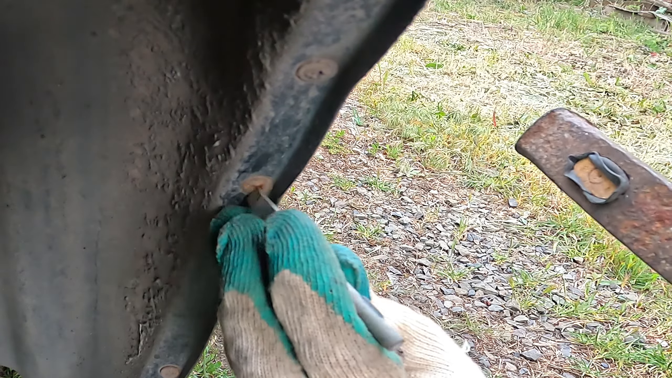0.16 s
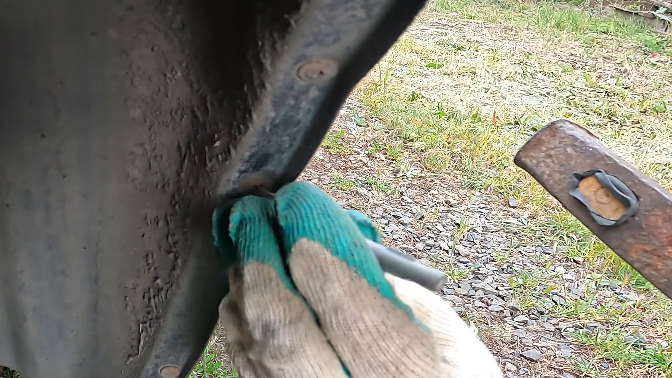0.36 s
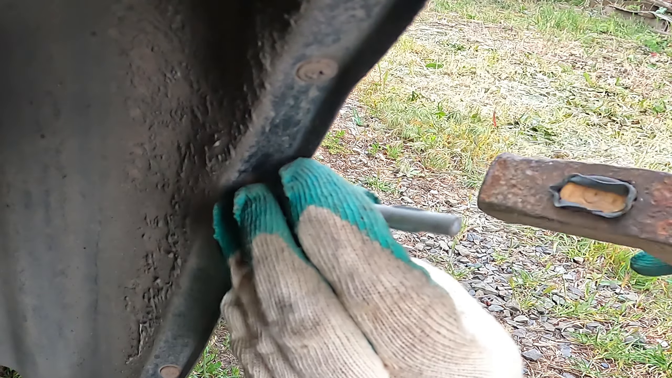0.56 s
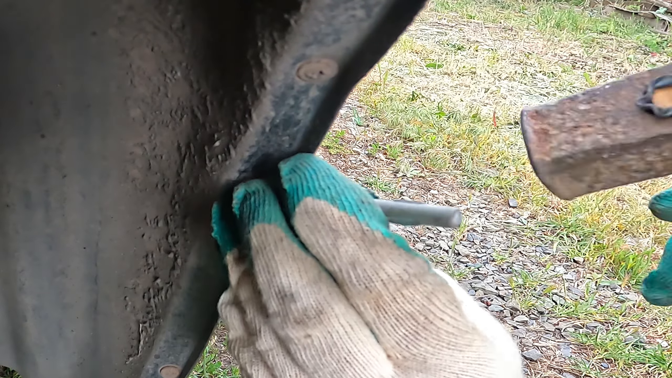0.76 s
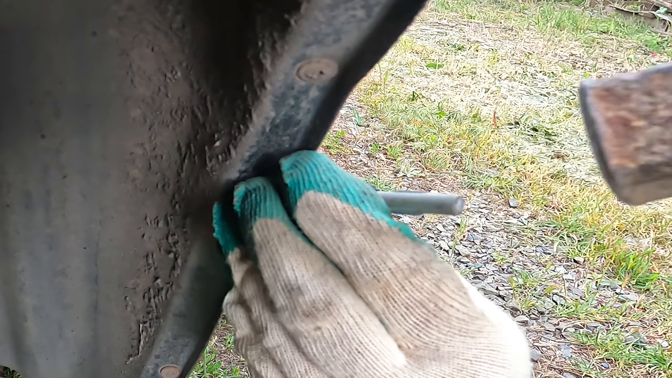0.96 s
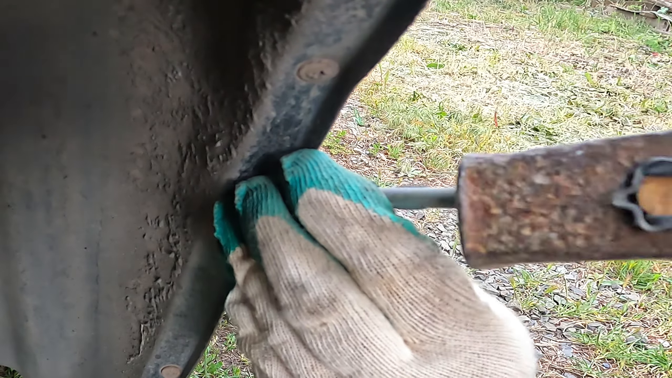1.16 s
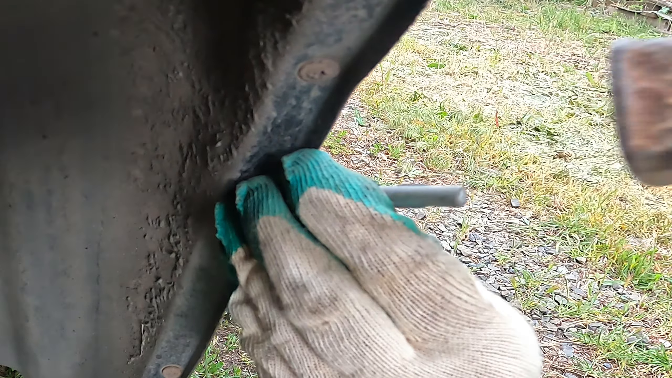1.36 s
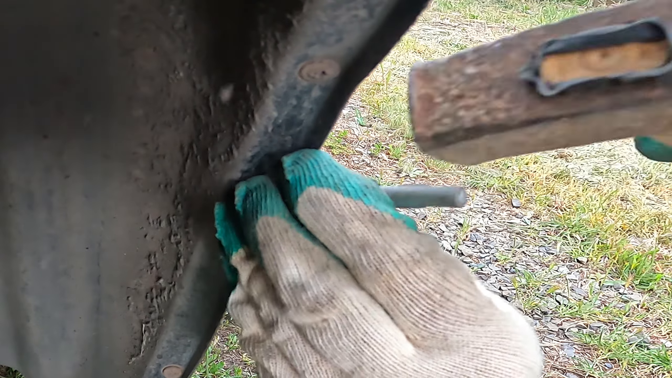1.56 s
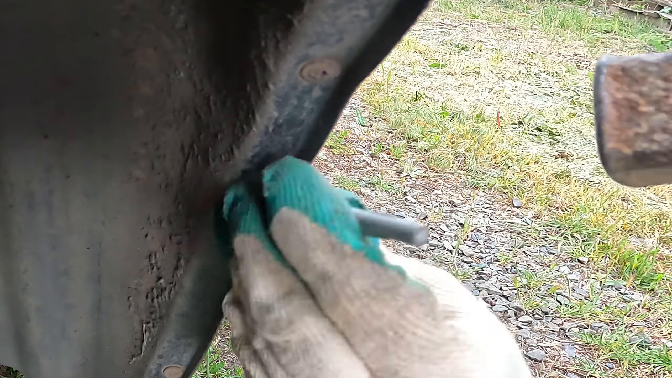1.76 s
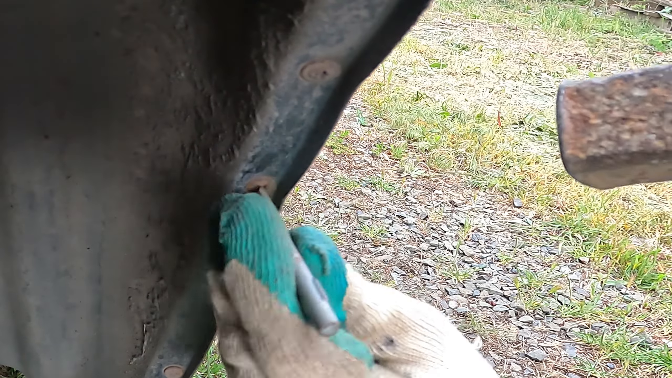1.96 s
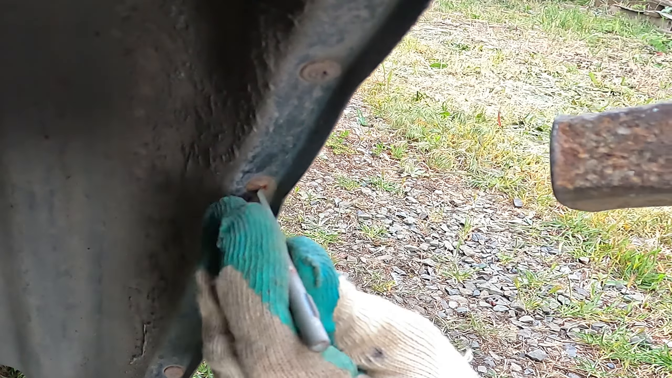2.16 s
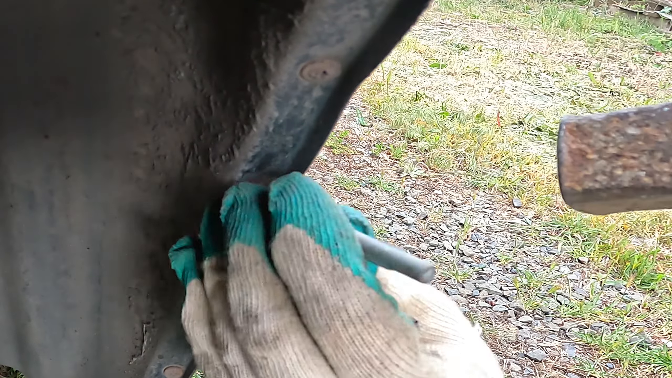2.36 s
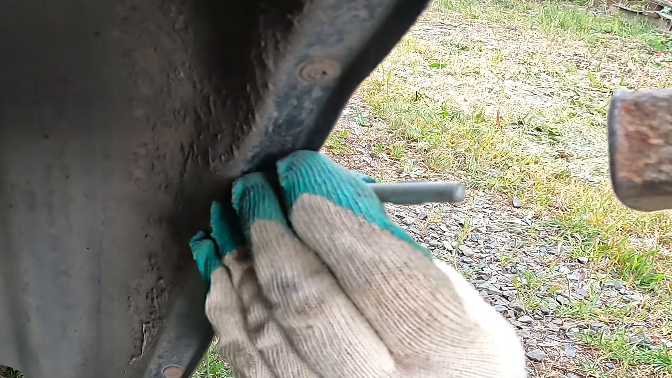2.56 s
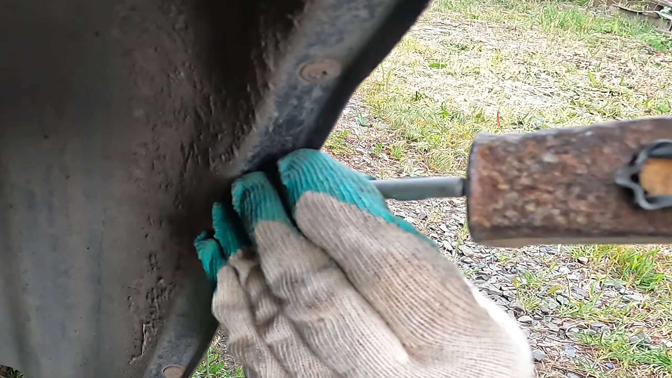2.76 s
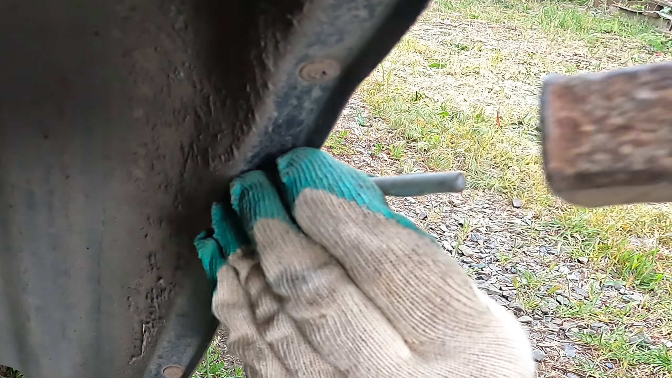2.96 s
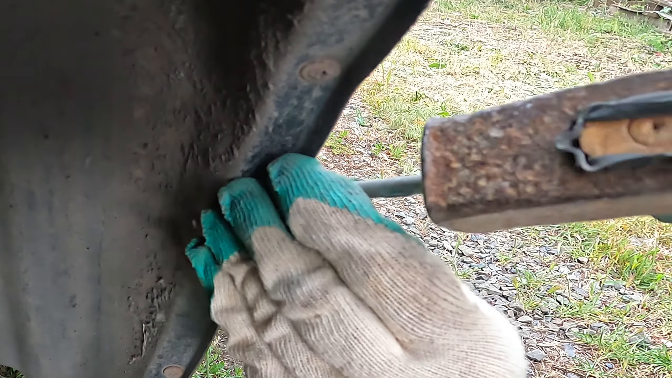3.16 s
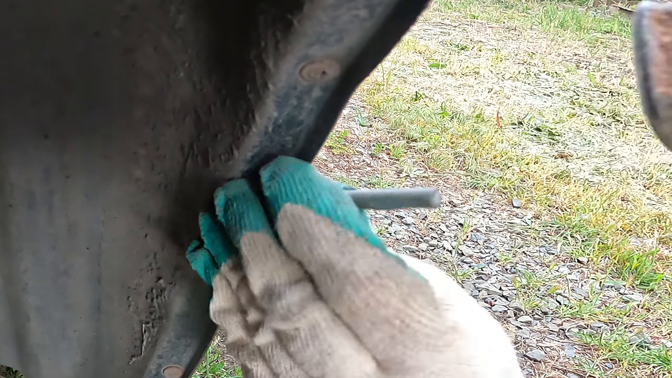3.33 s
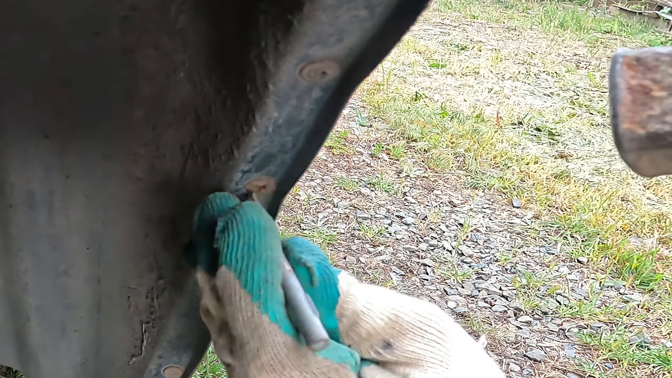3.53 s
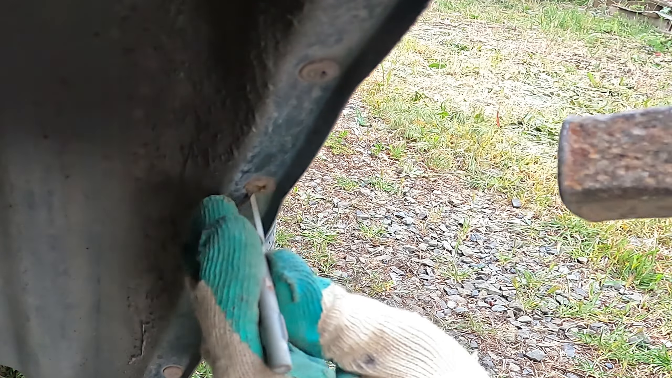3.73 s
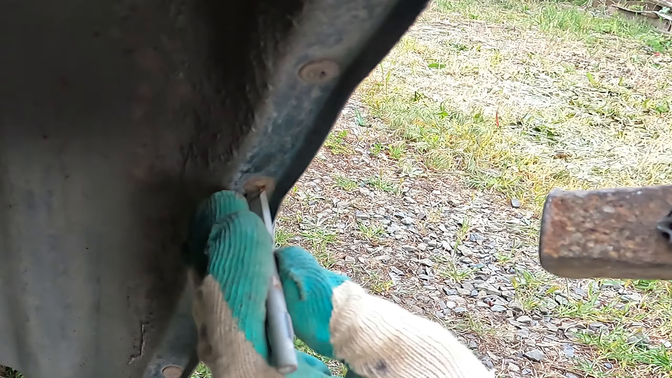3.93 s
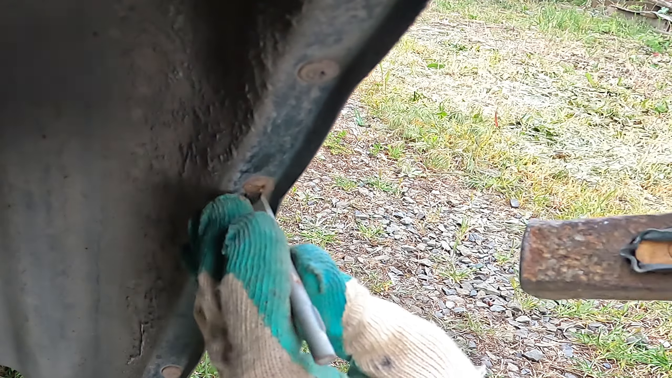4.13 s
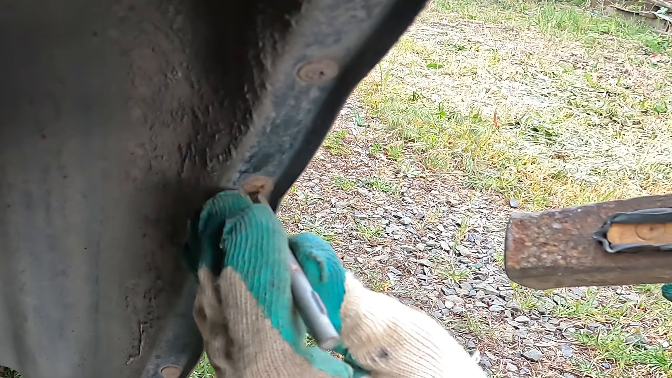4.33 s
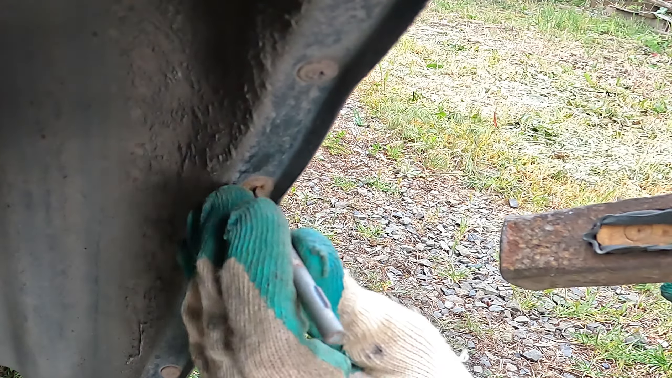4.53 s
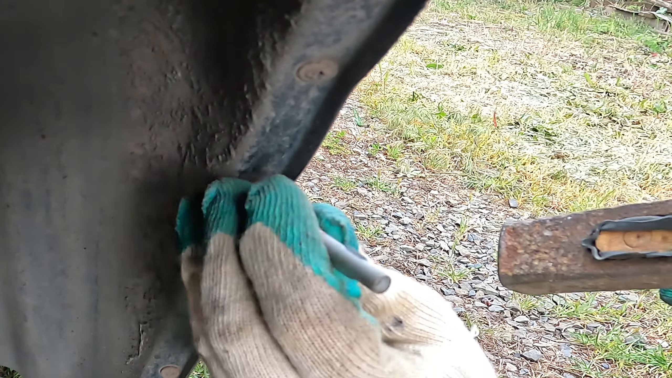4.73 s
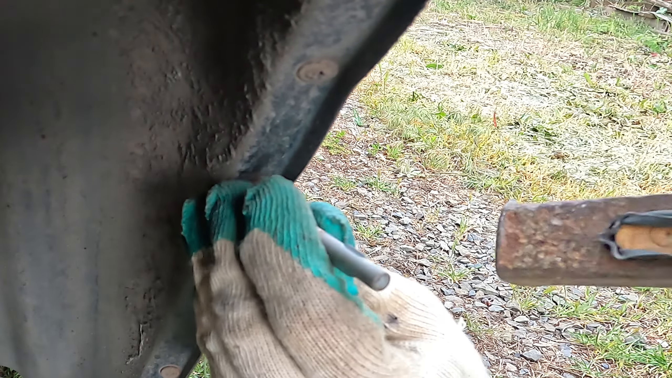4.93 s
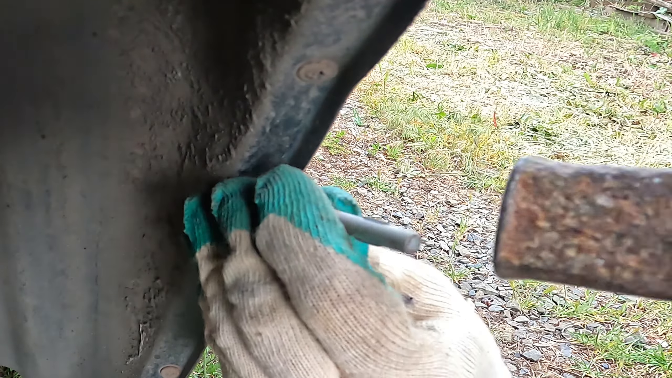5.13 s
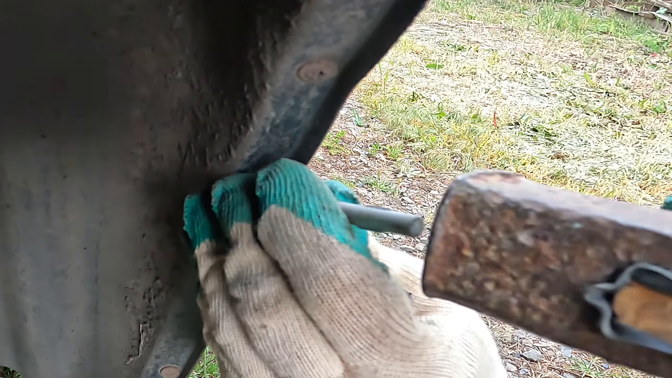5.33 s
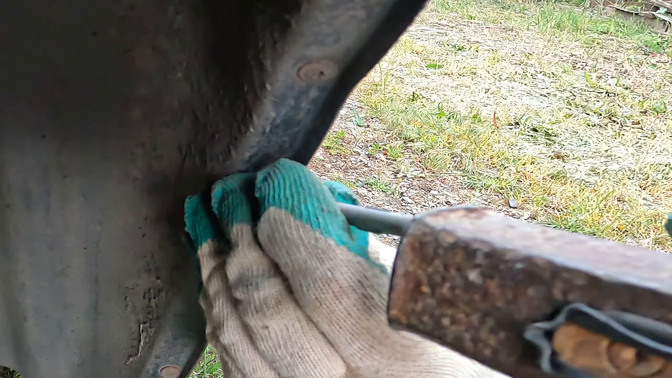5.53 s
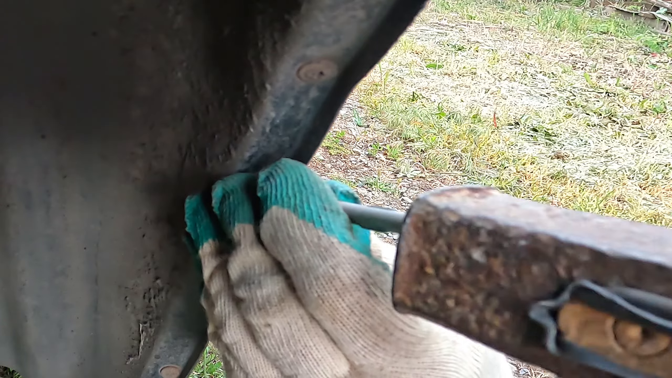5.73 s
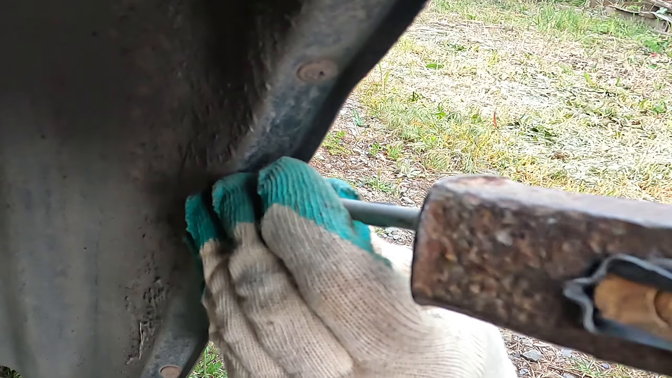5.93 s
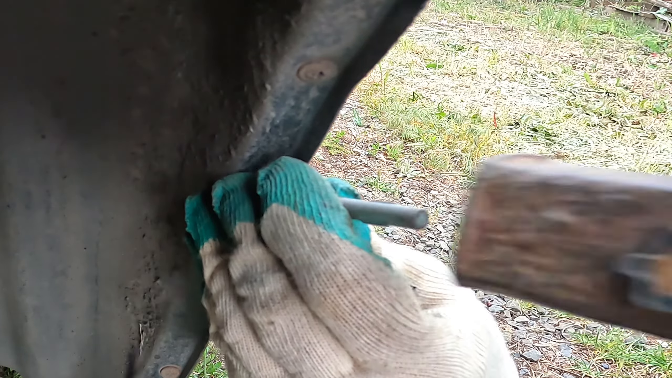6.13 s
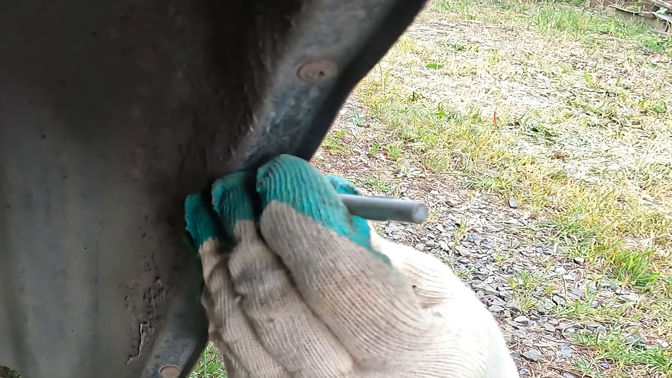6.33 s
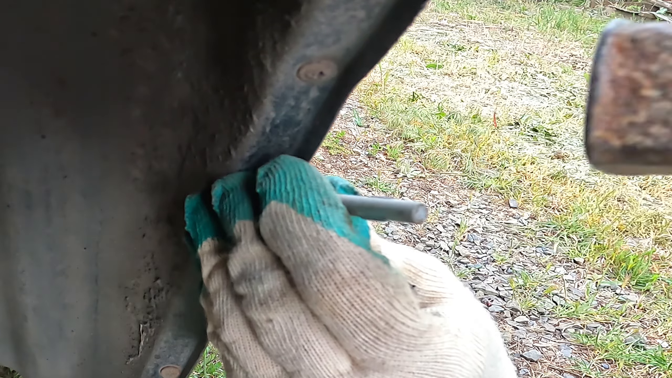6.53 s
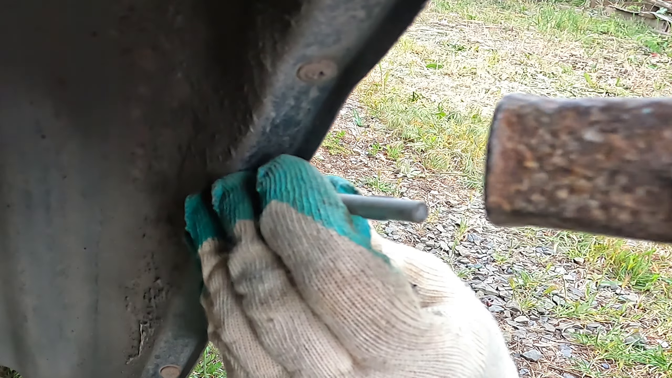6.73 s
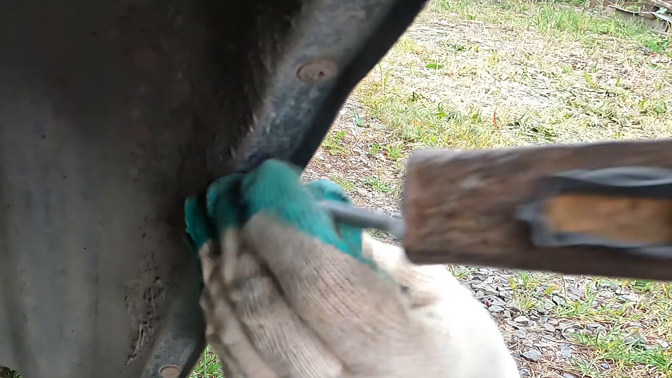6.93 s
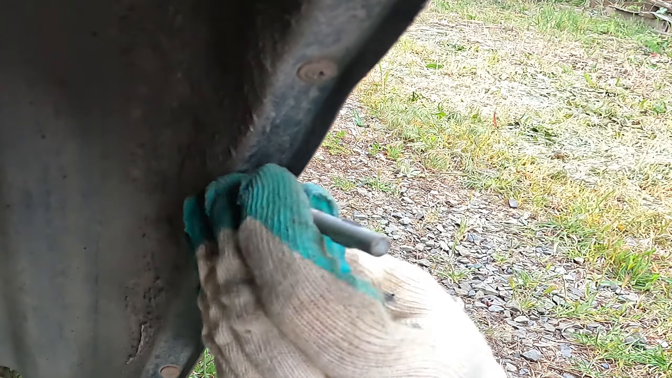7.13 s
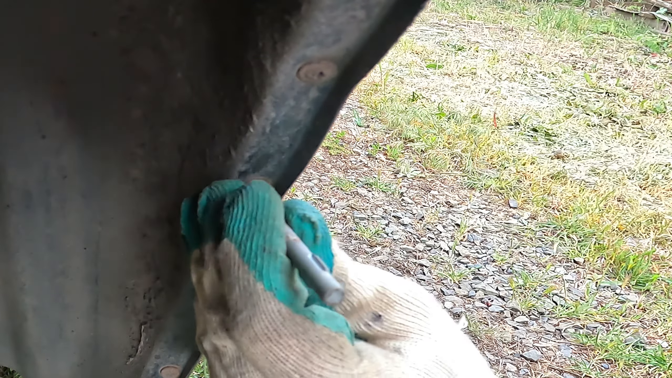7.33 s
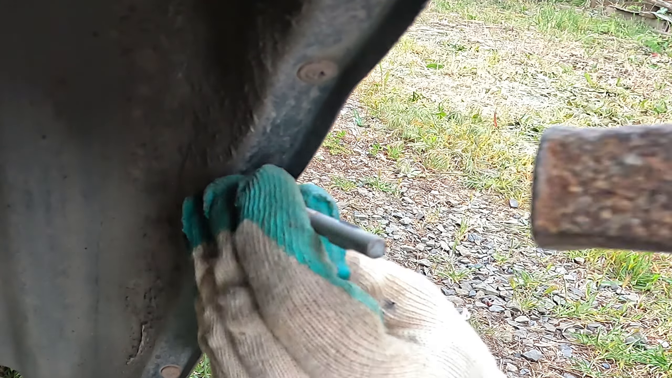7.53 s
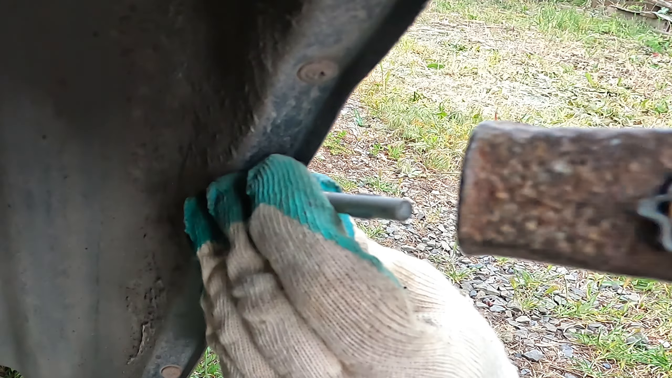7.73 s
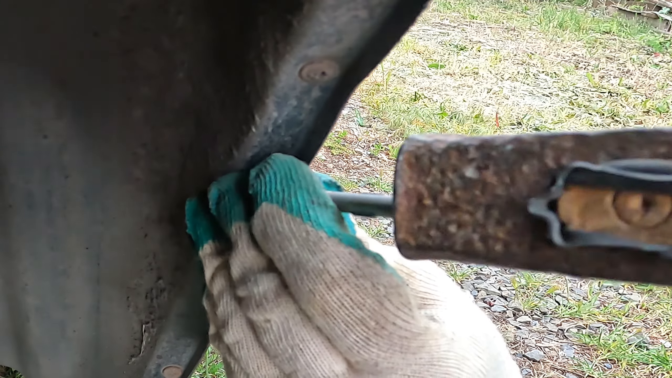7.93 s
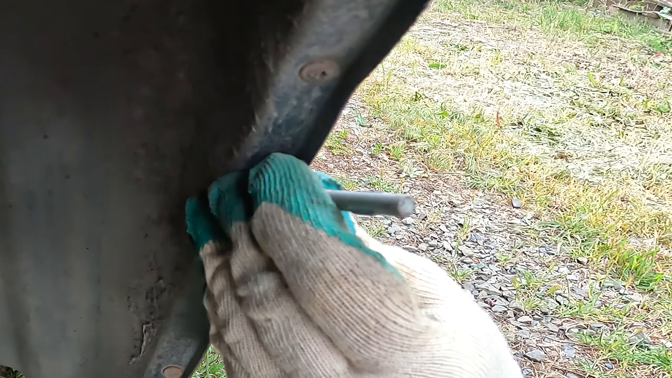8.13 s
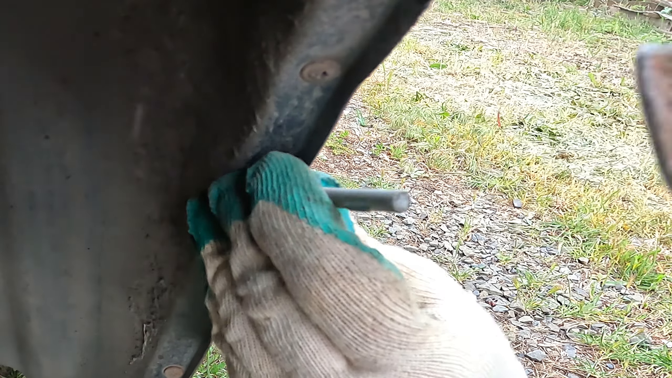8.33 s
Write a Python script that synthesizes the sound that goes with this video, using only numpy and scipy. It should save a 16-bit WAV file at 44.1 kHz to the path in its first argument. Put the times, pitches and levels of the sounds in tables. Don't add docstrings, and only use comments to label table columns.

```python
import sys
import numpy as np
from scipy import signal
from scipy.fft import rfft, irfft
from scipy.io import wavfile
from scipy.ndimage import uniform_filter1d, minimum_filter1d

SR = 44100
rng = np.random.default_rng(int(sys.argv[2]) if len(sys.argv) > 2 else 0)


def boost_factor(decibels):
    exponent = np.asarray(decibels, float) / 20
    return 10 ** exponent


def unload_wav(signal):
    wavfile.write(
        sys.argv[1],
        SR,
        np.round(np.clip(np.atleast_2d(signal).T, -1, 1) * 32767).astype(np.int16),
    )


N = 373968
HALF = np.array([[.5], [-.5]])
AHEAD_S = .0105


def read(points, hz):
    f, value = np.transpose(points)
    return np.interp(np.log(hz + 1), np.log(f + 1), value)


def curve(rows, t):
    s, *columns = np.transpose(rows)
    return [np.interp(t, s, c) for c in columns]


def evened(x):
    return x / np.sqrt(np.mean(x ** 2) + 1e-20)


def add(mix, s, sound, pan_db):
    part = mix[:, round(s * SR):][:, :len(sound)]
    part += sound[:part.shape[1]] * boost_factor(HALF * pan_db)


def ring(modes, t, rise_s, phase_spread, longest_s):
    hz, db, t60 = np.transpose(modes)[:, :, None]
    level_luck, phase_luck, pitch_luck = rng.standard_normal((3, len(modes), 1))
    pair = 1 + .3 * np.cos(2 * np.pi * .03 * hz * pitch_luck * t)
    fall_db = db + 1.5 * level_luck - 60 * t / np.minimum(t60, longest_s)
    phase = 2 * np.pi * hz * (1 + .008 * pitch_luck) * t + phase_spread * phase_luck
    out = (boost_factor(fall_db) * pair * np.sin(phase)).sum(0)
    out = out * (1 - np.exp(-t / rise_s)) ** 2
    return out / abs(out).max()


def burst(bands, t, width):
    z, hz = rfft(rng.standard_normal(len(t))), np.fft.rfftfreq(len(t), 1 / SR)
    out = 0
    for centre_hz, db, t60, tail_db, tail_t60 in bands:
        shape = np.exp(-(np.log(hz / centre_hz + 1e-9) / width) ** 2)
        decay = boost_factor(-60 * t / t60) + boost_factor(tail_db - 60 * t / tail_t60)
        out = out + evened(irfft(z * shape, len(t))) * boost_factor(db) * decay
    out = out * np.minimum(t / 0.00078, 1) ** 2
    return out / abs(out).max()


def swell(start, length, peak, edge):
    u = np.clip((np.arange(N) / SR - start) / length, 0, 1)
    warp = np.log(.5) / np.log(np.clip(peak, .1, .9))
    return np.sin(np.pi * u ** warp).clip(0) ** edge


# [f/Hz, left-right likeness]
COHERENCE = [(60, 1.0), (240, 1), (950, 0.47), (3770, 0.71), (15000, 0.99)]


def hiss(spectrum, size, patchy_db, flicker_db):
    hop, hz = size // 4, np.fft.rfftfreq(size, 1 / SR)
    a, b, c, d, patches = rng.standard_normal((N // hop + 5, len(hz), 5)).T
    patches = evened(uniform_filter1d(uniform_filter1d(patches, size=5, axis=0), size=7, axis=1))
    flicker = evened(uniform_filter1d(rng.standard_normal(a.shape[1]), size=3))
    same = np.clip(read(COHERENCE, hz), -1, .98)[:, None]
    left = a + 1j * b
    right = same * left + np.sqrt(1 - same ** 2) * (c + 1j * d)
    level_db = patchy_db * patches + flicker_db * flicker
    z = np.array([left, right]) * boost_factor(read(spectrum, hz)[:, None] + level_db)
    return evened(signal.istft(z, nperseg=size, noverlap=size - hop)[1][:, :N])


# [f/Hz, level/dB, t60/s, tail level/dB, tail t60/s]
CRACK = [(1760, -9.5, 0.0072, -22, 0.07), (2692, -10, 0.007, -20.5, 0.07), (3250, -8, 0.013, -21.5, 0.089),
         (4710, 1, 0.007, -24.5, 0.041), (6300, -3.5, 0.0065, -23, 0.045)]


def steel_crack(t, crack_db):
    looser_db = 0.25 * (crack_db + 6.0)
    bands = [(f, db, t60, tail_db - looser_db, tail_t60) for f, db, t60, tail_db, tail_t60 in CRACK]
    return boost_factor(crack_db) * burst(bands, t, 0.17)


# [f/Hz, level/dB, t60/s, tail level/dB, tail t60/s]
SIZZLE = [(7415, -5.5, 0.023, -28.5, 0.05), (9660, 3.5, 0.0057, -21, 0.027),
          (12400, -11.5, 0.014, -25, .025), (14600, -28.5, .01, -29.5, .02)]


def steel_sizzle(t, sizzle_db):
    return boost_factor(sizzle_db) * burst(SIZZLE, t, 0.13)


# [f/Hz, level/dB, t60/s]
CLANK = [(980, -3, 0.024), (1030, -8, 0.21), (1035, -1, 0.032), (1148.6, -15.5, 0.12), (1153, -7, 0.043),
         (1196, -8, 0.06), (1316, -7, 0.18), (1588, -8, 0.13), (1892, -15.5, 0.047)]
KNOCK = [(419, -6.5, 0.072), (490, -2, 0.086), (555, -8.5, 0.091), (624, -5, 0.11), (689, -6, 0.14),
         (753, -2.5, 0.18), (910, -6.5, 0.052)]
BRACE = [(962, 0.5, 0.1), (750, -5, .07), (1160, -5.5, .06), (870, -3.5, .06)]


def bracket(t, clank_db, knock_db):
    hand_t60 = .055
    out = boost_factor(clank_db) * ring(CLANK, t, 0.00034, 1.3, hand_t60)
    out += boost_factor(knock_db - 13) * ring(BRACE, t, 0.00081, 1.9, .25)
    out += boost_factor(knock_db) * ring(KNOCK, t, 0.0065, 1.5, hand_t60)
    return out


# [f/Hz, level/dB, t60/s, tail level/dB, tail t60/s]
RATTLE = [(598.6, 0, .06, -27, 0.29), (1000, 0.5, .06, -25, 0.27), (1590, -8.5, .055, -28, .2),
          (2500, -17, .05, -26, .2), (4000, -25, .04, -22, .2)]


def rattle(t, clank_db, knock_db):
    level_db = knock_db + .15 * (clank_db - knock_db) - 4.0
    return boost_factor(level_db) * burst(RATTLE, t, 0.52)


# [f/Hz, level/dB, t60/s]
BOOM = [(141.7, -15.5, .08), (171.3, -8, 0.21), (195.1, -4.5, 0.073), (213, 4.5, 0.08),
        (241.9, -7.5, 0.068), (272, -6, 0.035), (322.8, -11, 0.1), (397.3, -14.5, 0.062)]
# [f/Hz, level/dB, t60/s, tail level/dB, tail t60/s]
THUD = [(180, -2.5, 0.18, -24, .9), (260, -11, .1, -26, .6), (350, -14, 0.12, -28, 0.34)]


def panel_boom(t):
    thud = burst(THUD, t, 0.25) * (1 - np.exp(-t / 0.005)) ** 2
    return ring(BOOM, t, 0.0081, 0.093, .09) + boost_factor(-4) * thud


# [f/Hz, left lead/rad, left-right level/dB]
PANEL_SIDES = [(100, 0, 1), (240, -.3, 1.5), (300, .6, 5), (390, .7, -6), (480, -1.3, 5), (610, -.3, 3),
               (800, -1.4, -5), (960, .3, 4), (1300, -1.1, 2), (2200, -.9, 7), (3800, -1, -2),
               (5400, -.5, -2), (8000, .5, 0), (13000, .9, 3)]


def radiate(x):
    hz, (f, lead, balance) = np.fft.rfftfreq(N, 1 / SR), np.transpose(PANEL_SIDES)
    sides = np.exp(1j * HALF * read(np.c_[f, lead], hz)) * boost_factor(HALF * read(np.c_[f, balance], hz))
    wall = boost_factor(-34.5) * np.exp(-2j * np.pi * hz * .14) / (1 + (hz / 700) ** 2)
    thin_tone = boost_factor(-12) / (1 - 1j * (hz - 8000) / 36) ** 2
    return irfft(rfft(x, axis=1) * sides * (1 + wall + thin_tone), N, axis=1)


# [t/s, force level/dB, boom level/dB, knock level/dB, sizzle level/dB]
BLOWS = [(1.251, -5.5, -6.5, -10, -21), (1.2998, -23, -9, -17, -47), (1.3265, -31, -14, -22, -55.5),
         (1.5987, -3.5, -8.5, -11, -16), (2.8977, -11, -12, -9, -28), (3.2392, -1, -7.5, -9.5, -9),
         (5.554, -8, -5.5, -14.5, -21.5), (5.796, -7.5, -6.5, -14.5, -21.5), (6.024, -9, -5.5, -12, -20),
         (6.2798, -9.5, -7, -12.5, -20), (7.0619, -6, -9, -9.5, -12.5), (7.9344, -11.5, -7, -17, -22),
         (7.9774, -24, -11.5, -17, -55), (7.9978, -33, -15, -21, -66), (8.314, -4, -6, -9.5, -8.5)]


def blows():
    out, t = np.zeros((2, N)), np.arange(16384) / SR
    for s, crack_db, boom_db, knock_db, sizzle_db in BLOWS:
        clank_db = crack_db - 1.5
        crack = steel_crack(t, crack_db)
        clank = bracket(t, clank_db, knock_db)
        for side in (-1, 1):
            add(out, s + .0006, rattle(t, clank_db, knock_db), side * 10.5)
        add(out, s + 0.00061, clank + crack + steel_sizzle(t, sizzle_db), 0)
        boom = panel_boom(t)
        add(out, s + .0052, boost_factor(boom_db + 3.0) * boom, 0)
        ahead_db = -10.5 + 0.1 * (sizzle_db + 20.0)
        copy = clank + boost_factor(-9.5) * crack + boost_factor(boom_db - 1.5) * boom
        for k in (1, 2, 3):
            add(out, s + 0.00064 - k * AHEAD_S, boost_factor(ahead_db - 11.0 * k) * copy, 0)
    return radiate(out)


# [f/Hz, level/dB, t60/s]
DRONE_ON = [(212, -4, 1.2), (232, 0, 3.5), (248.5, -1, 3.0), (296, -8, .9)]


def panel_ring():
    t, (s, boom_db) = np.arange(N) / SR, np.transpose(BLOWS)[[0, 2]]
    last = np.searchsorted(s, t) - 1
    since = t - s[last]
    out = 0
    for hz, db, t60 in DRONE_ON:
        level = boost_factor(boom_db[last] - 36 + db - 60 * abs(since) / t60) * (last >= 0)
        level = uniform_filter1d(level, round(.03 * SR))
        out = out + level * np.sin(2 * np.pi * (hz * t + rng.random()))
    return out


def touch_sound(t, tick_db, body_hz, body_db, knock_db):
    t60 = .045 * boost_factor(0.1 * (body_db + 44.5)) * (1300 / body_hz) ** 0.39
    tick = burst([(2810, -5.5, 0.73 * t60, -23.0, 1.5 * t60),
                  (4730, 3.0, 0.16 * t60, -14, 1.2 * t60),
                  (7850, -7.5, 0.65 * t60, -19.5, t60),
                  (11500, -14.0, 0.28 * t60, -18.0, 1.1 * t60)], t, 0.24)
    body = burst([(body_hz, 0, t60, -18, 3.4 * t60),
                  (1.99 * body_hz, -9, 0.7 * t60, -18, 3.1 * t60),
                  (0.49 * body_hz, -7, 0.89 * t60, -18, 2.8 * t60)], t, .4)
    knock = burst([(556, -4.0, 0.64 * t60, -13.5, 3.0 * t60),
                   (243, -5.0, 3.5 * t60, -15.5, 3 * t60)], t, 0.25)
    return boost_factor(tick_db) * tick + boost_factor(body_db) * body + boost_factor(knock_db) * knock


# [t/s,
# body level/dB, body f/Hz, tick level/dB]
TAPS = [(0.1118, -53.5, 1640, -77), (0.1694, -42.5, 895, -60), (0.1876, -27.5, 1230, -47),
        (0.1945, -33, 1500, -42), (0.2035, -32, 1200, -58), (0.212, -31, 1700, -46),
        (0.2228, -19.5, 1080, -42), (0.2635, -23.5, 1189, -41.5), (0.3834, -35.5, 2900, -59),
        (0.4321, -42, 1390, -74), (0.4628, -41.5, 1530, -74), (1.489, -42, 2150, -55.5),
        (1.878, -20, 2860, -28), (1.9225, -39.5, 1480, -50), (1.9852, -40.5, 1320, -44),
        (2.0676, -29, 2500, -41.5), (2.2797, -42, 3800, -44), (2.2843, -24, 1250, -56),
        (2.4605, -41.5, 788, -53), (2.5194, -31, 1210, -47.5), (3.2295, -20, 1000, -50),
        (3.2717, -30.5, 699, -41.5), (3.584, -38, 330, -62), (3.6548, -35.5, 1106, -57.5),
        (4.1826, -40.5, 825, -65.5), (4.235, -49.5, 800, -78.5), (4.4651, -26.5, 1560, -44),
        (4.4817, -19.5, 1350, -30), (4.5383, -32.5, 1400, -38), (4.5414, -17, 1330, -22.5),
        (4.5545, -22.5, 1390, -52), (4.5715, -22.5, 915, -44.5), (6.1158, -44, 900, -52),
        (6.5274, -45.5, 1175, -42), (7.0088, -48.5, 1023, -41.5)]
# [t/s, tick level/dB, body level/dB, left-right level/dB]
GRIT = [(1.704, -43.5, -66, 10), (1.7361, -53, -50, 3), (1.7642, -48, -58, -3), (1.8025, -49.5, -69, 7.5),
        (2.0268, -51, -52, 5), (2.1495, -58, -48, 5.5), (2.2023, -59, -57, 8), (3.3732, -37, -66.5, 7),
        (3.4451, -45, -59, -2.5), (3.5321, -45.5, -71, 3.5), (4.1138, -56, -54.5, 5),
        (5.3612, -54.5, -70, 4), (5.7444, -51.5, -61.5, -8), (5.8961, -49.5, -53, 2.5),
        (5.9514, -53, -65, 13), (5.9754, -42, -60, 4.5), (6.5744, -59, -69, -7), (6.6159, -49.5, -67.5, -3),
        (6.6593, -53, -74.5, 4), (6.6985, -52.5, -57.5, 5), (6.744, -58, -59, 0), (6.8031, -51, -62, 4),
        (6.963, -59, -52.5, 4.5), (7.322, -56, -59.5, 10), (7.401, -41.5, -54, 10.5),
        (7.5057, -55, -59.5, 17), (7.604, -54.5, -54.5, 7), (7.65, -50, -48, 12), (7.7423, -55, -52.5, 6),
        (7.784, -57.5, -54.5, 9),
        (1.439, -52, -64, 2), (1.5618, -46, -57.5, 1.5), (1.8566, -53, -58, -3), (2.121, -54, -56.5, 0.5),
        (2.3482, -55, -59, 2), (2.992, -56, -60, 2), (3.36, -50, -72, 5), (3.388, -56, -66, 3),
        (1.995, -52, -56, 0.5), (3.735, -62, -53, 1.5), (6.39, -55.5, -59, 0), (6.5963, -58, -66, 1.5),
        (6.6821, -55, -71, 0), (6.86, -62, -68, 2), (6.925, -62, -71, 2), (7.345, -60.5, -62, 5.5),
        (7.368, -62, -63.5, 4), (7.427, -56, -66.5, 5), (7.45, -59.5, -68, 4), (7.527, -58, -62, 4),
        (7.594, -60, -68, 4), (7.6254, -53, -62, 4), (7.695, -63.5, -61.5, 4), (7.758, -57, -61, 3),
        (7.8215, -61, -65, 3), (7.888, -60, -74, 3), (8.163, -62, -76, 2)]


def ticks():
    out, t = np.zeros((2, N)), np.arange(8192) / SR
    touches = [(s, tick_db, hz, db, db - 8.5, 2.5 + 6 * rng.standard_normal())
               for s, db, hz, tick_db in TAPS]
    touches += [(s, tick_db, 1350, body_db, body_db - 10, pan_db)
                for s, tick_db, body_db, pan_db in GRIT]
    for s, tick_db, body_hz, body_db, knock_db, pan_db in touches:
        touch = touch_sound(t, tick_db, body_hz, body_db, knock_db)
        add(out, s, touch, pan_db)
        add(out, s - AHEAD_S, boost_factor(-21.5 - body_hz / 250) * touch, pan_db)
    return out


# [start t/s, length/s, level/dB]
RUBS = [(0, 0.06, -61), (0.27, 0.145, -58.5), (0.443, 0.096, -58), (0.518, 0.31, -57.5), (0.8, 0.19, -51.5),
        (0.966, 0.13, -60), (1.387, 0.69, -72.5), (1.85, 0.82, -69.5), (3.308, 0.57, -72),
        (3.9, 0.22, -72.5), (4.707, 0.21, -58.5), (4.933, 0.14, -66.5), (5.069, 0.24, -71.5),
        (5.649, 0.94, -79.5), (7.294, 0.28, -71), (7.591, 0.089, -69), (8.378, 0.2, -69)]


def glove_grip():
    return boost_factor(-86) + sum(boost_factor(db) * swell(s, length, .45, .98) for s, length, db in RUBS)


# [f/Hz, level/dB]
RUSTLE = [(1180, -32.5), (2000, -2), (2640, -4.5), (3710, -5.5), (4410, -9), (6940, -11.5), (8850, -24.5),
          (13100, -24.5), (16000, -52.5)]


def glove_rustle(grip):
    return grip * hiss(RUSTLE, size=256, patchy_db=2.5, flicker_db=3.0)


# [f/Hz, level/dB]
RUMBLE = [(11, -46.5), (18, -2.5), (38, 2), (75, 5.5), (98, -3.5), (141, -12), (200, -23), (260, -39),
          (440, -120)]
# [t/s, level/dB]
WIND = [(0, -37.5), (.85, -39.5), (1.13, -37), (1.6, -43.5), (2.3, -56), (2.55, -43.5), (2.83, -44.5),
        (3.25, -48), (3.54, -54.5), (4.04, -46.5), (4.6, -42), (5.26, -41), (5.48, -35.5), (5.66, -53.5),
        (6.25, -53), (6.71, -56.5), (7.3, -53), (8.48, -53)]


def wind():
    gust_db = curve(WIND, np.arange(N) / SR)[0]
    return boost_factor(gust_db) * hiss(RUMBLE, size=4096, patchy_db=3.0, flicker_db=3.5)


# [f/Hz, level/dB]
DRONE = [(59, -29), (100, 1), (188, -13), (237, -23), (253, -17), (290, -14), (359, -34.5), (500, -38.5),
         (650, -64), (1100, -120)]


def traffic(traffic_db):
    return boost_factor(traffic_db) * hiss(DRONE, size=2048, patchy_db=-2.0, flicker_db=0.5)


# [start t/s, length/s, f/Hz, level/dB]
ENGINES = [
    (0.993, 0.93, 38, -46.5),
    (1.31, 0.76, 88.4, -44.5),
    (2.451, 0.84, 60, -41),
    (6.397, 1.6, 37.67, -46.5),
    (7.403, 1.0, 83, -53.5),
]


def engines():
    out = np.zeros(N)
    for start, length, hz, db in ENGINES:
        drift = rng.standard_normal(N)
        drift = evened(uniform_filter1d(uniform_filter1d(drift, size=6000), size=6000))
        tone = np.sin(2 * np.pi * np.cumsum(hz * (1 + 0.029 * drift)) / SR)
        out += boost_factor(db) * swell(start, length, 0.59, 0.37) * tone
    return out


# [start t/s, length/s, f/Hz, level/dB]
TYRES = [
    (0.402, 0.67, 1530, -57.5),
    (1.949, .85, 1480, -65.5),
    (3.4, .8, 1480, -72.5),
    (4.68, 0.61, 1350, -67),
]


def tyres():
    hz, out = np.fft.rfftfreq(N, 1 / SR) + 1, 0
    width, low_hz = 0.098, 588
    for start, length, top_hz, db in TYRES:
        shape = 1 / (1 + (np.log(hz / top_hz) / width) ** 2)
        shape += boost_factor(-10) / (1 + (np.log(hz / low_hz) / width) ** 2)
        both, own = rng.standard_normal(N), rng.standard_normal((2, N))
        whine = evened(irfft(rfft(both + .6 * own, axis=1) * shape, N, axis=1))
        out = out + boost_factor(db) * swell(start, length, 0.38, 0.48) * whine
    return out


# [t/s, f/Hz, level/dB]
CHIRP = [(0, 3808, -6), (.02, 3630, 16), (.032, 3384, -25), (.046, 3100, -11.5), (.062, 3350, 15),
         (.074, 4072, 11), (.085, 3610, 0)]
# [t/s, level/dB]
CHIRPS = [
    (2.672, -81),
    (3.968, -82),
    (5.108, -72),
]


def bird():
    out, t = np.zeros((2, N)), np.arange(0, CHIRP[-1][0], 1 / SR)
    hz, db = curve(CHIRP, t)
    for s, level_db in CHIRPS:
        drift = evened(uniform_filter1d(rng.standard_normal(len(t)), size=200))
        tone = np.sin(2 * np.pi * np.cumsum(hz * (1 + .05 * drift)) / SR)
        add(out, s, boost_factor(level_db + db) * tone * signal.windows.tukey(len(t), .15), 8.0)
    return out


# [f/Hz, level/dB]
AIR = [(190, -40), (330, -3.5), (466, -15), (545, -1), (819, -8), (1160, -1), (4190, -22.5), (7020, -17),
       (12300, -33), (14000, -54)]


def still_air(traffic_db, grip):
    air_db = -68.5 + 0.48 * (traffic_db + 52) + .3 * (20 * np.log10(grip) + 78.4)
    return boost_factor(air_db) * hiss(AIR, size=512, patchy_db=2.5, flicker_db=2.5)


# [t/s, level/dB]
TRAFFIC = [(0, -48), (.6, -47), (1.5, -47), (2.5, -56.5), (3.4, -50.5), (3.8, -57), (5.3, -49), (6.2, -47),
           (6.8, -57.5), (8.48, -62.5)]


def background():
    traffic_db = curve(TRAFFIC, np.arange(N) / SR)[0]
    grip = glove_grip()
    near = glove_rustle(grip) + panel_ring()
    far = wind() + traffic(traffic_db) + engines() + tyres()
    return near + far + still_air(traffic_db, grip)


# [f/Hz, t60/s]
YARD = [(100, 0.72), (250, 0.98), (600, 0.25), (1000, .35), (1600, 0.4), (4000, 0.06), (10000, 0.035)]


def yard(x):
    taps = np.zeros((2, SR))
    at = np.arange(700, SR - 20, 20) + rng.integers(0, 20, (2, (SR - 701) // 20))
    np.put_along_axis(taps, at, rng.choice([-1., 1.], at.shape), 1)
    taps[1] = .8 * taps[0] + .6 * taps[1]
    hz, t, z = signal.stft(taps, SR, nperseg=512)
    decay = boost_factor(-60 * t / read(YARD, hz)[:, None])
    tail = signal.istft(z * decay, SR, nperseg=512)[1]
    return signal.fftconvolve(x, tail / np.linalg.norm(tail[0]), axes=1)[:, :N]


# [f/Hz, left lead/rad]
LAG = [(100, -0.16), (1000, -0.24), (3000, 0.67), (7000, 0.21), (12000, 0)]


def scene():
    hz, far = np.fft.rfftfreq(N, 1 / SR), bird()
    ports = np.exp(1j * read(LAG, hz) * HALF)
    light = irfft(rfft(ticks() + background() + far, axis=1) * ports, N, axis=1)
    heavy = blows()
    return heavy + light + yard(boost_factor(-42.5) * heavy + boost_factor(6.0) * far)


def low_pass(x):
    return signal.sosfilt(signal.butter(12, 16510, fs=SR, output="sos"), x)


def record(dry):
    room = np.minimum(.97 / (abs(dry).max(0) + 1e-9), 1)
    gain = uniform_filter1d(minimum_filter1d(room, size=301), size=301)
    return low_pass(dry * gain)


dry = scene()
out = record(dry)
unload_wav(out)
```